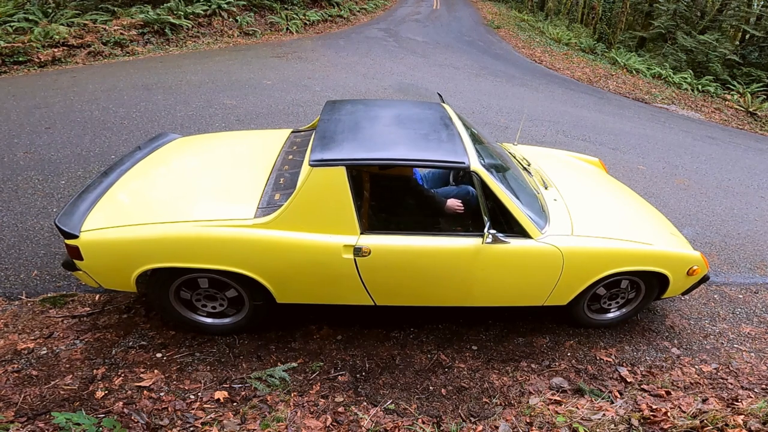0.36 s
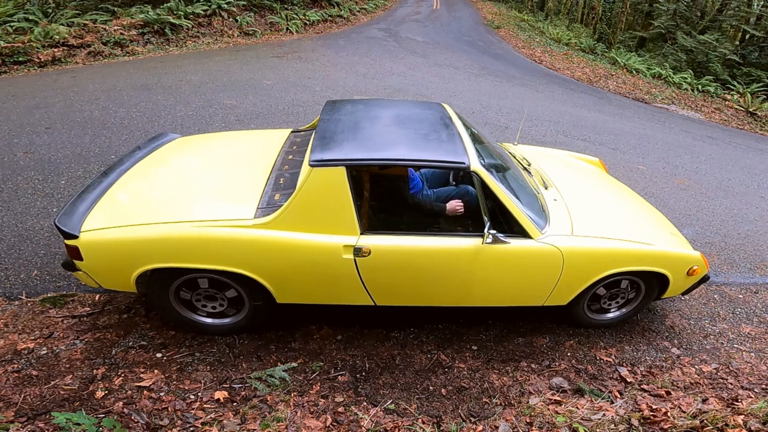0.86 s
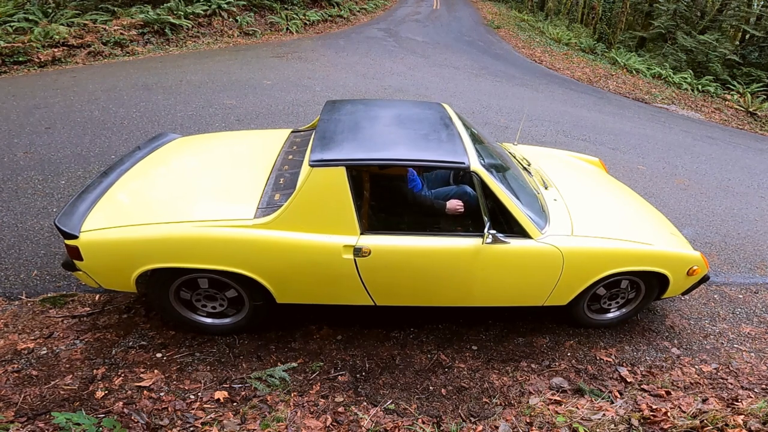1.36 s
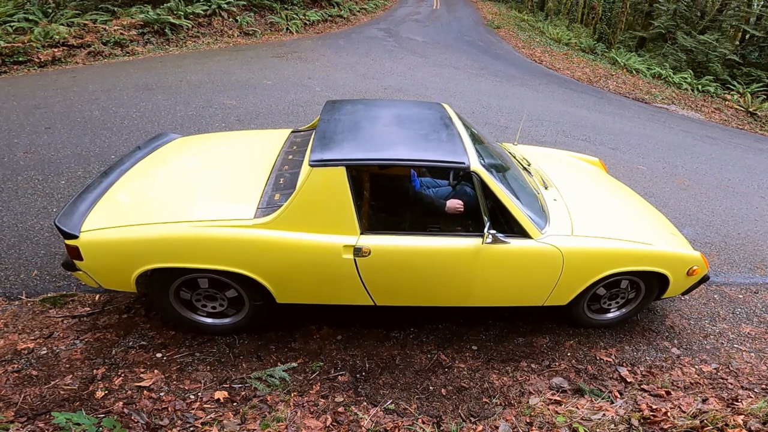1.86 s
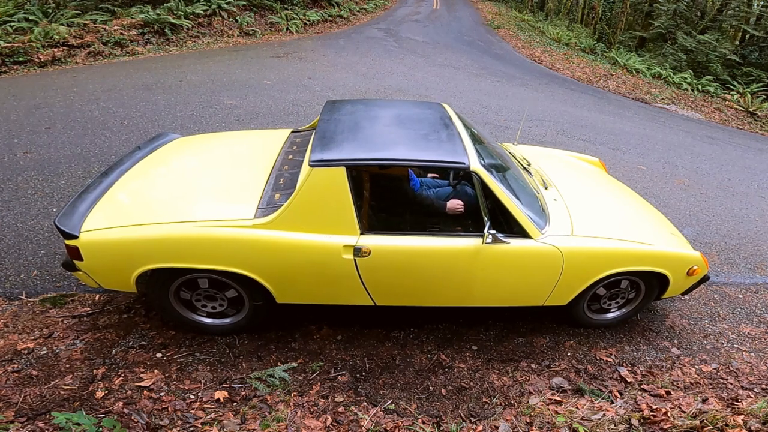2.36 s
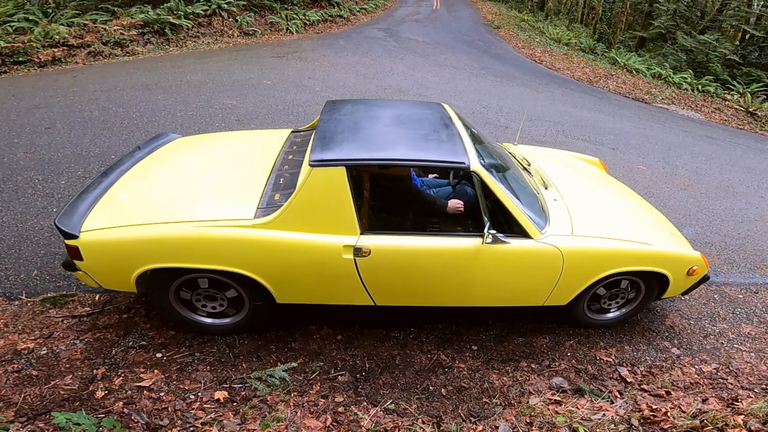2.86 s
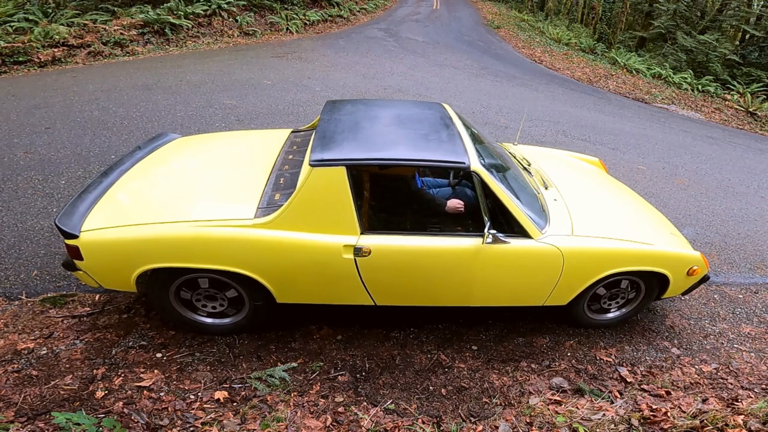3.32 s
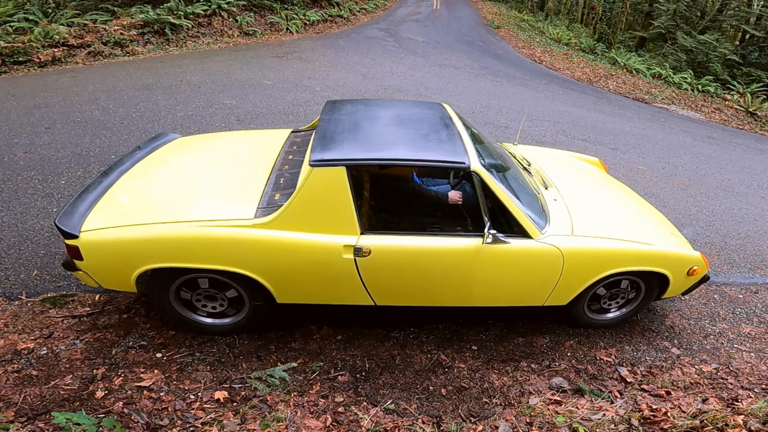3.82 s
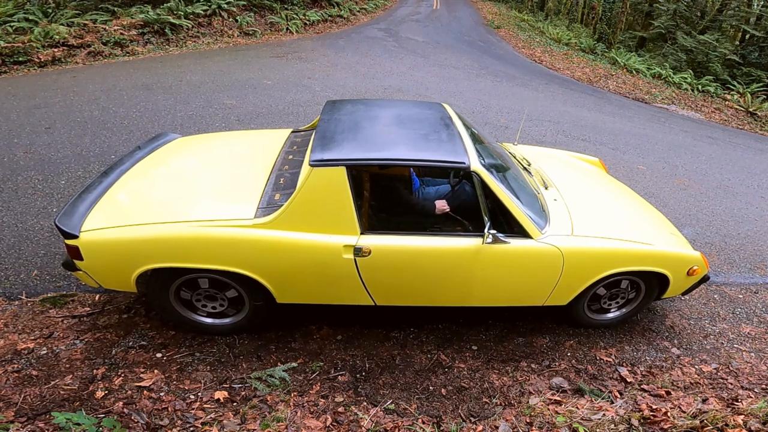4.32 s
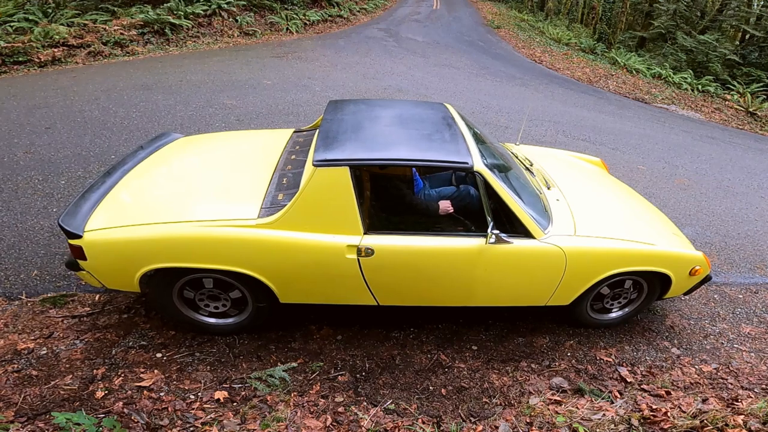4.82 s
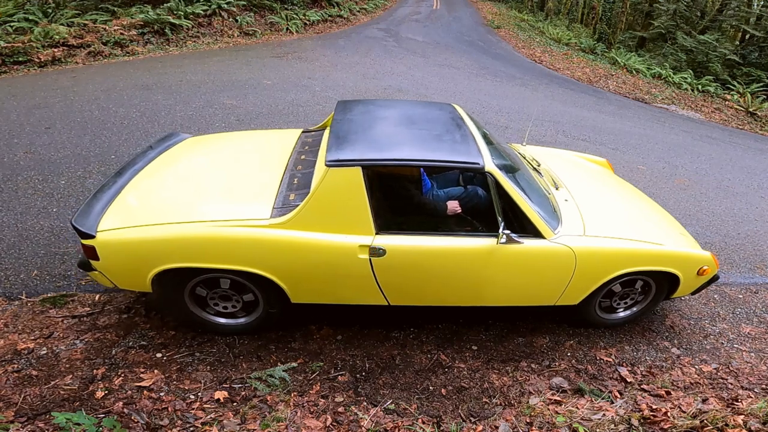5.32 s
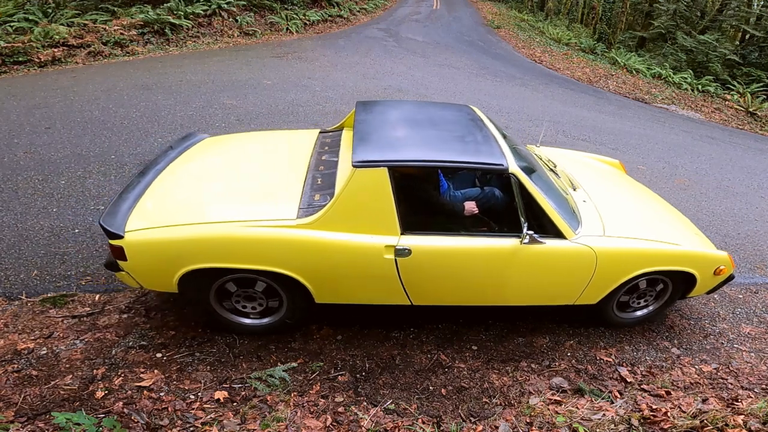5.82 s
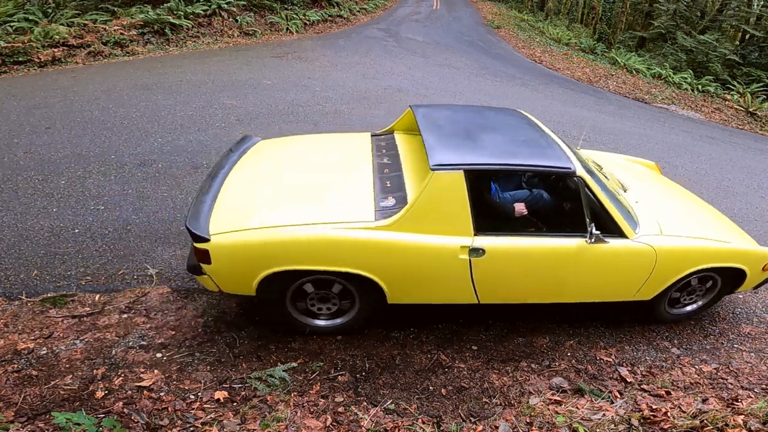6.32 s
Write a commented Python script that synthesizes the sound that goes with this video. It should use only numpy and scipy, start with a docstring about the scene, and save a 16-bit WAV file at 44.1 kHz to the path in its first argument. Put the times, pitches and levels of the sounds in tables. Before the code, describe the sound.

Outdoors, a small air-cooled four-cylinder car idles low and steady under close cloth rustle and padded bumps. About a second in, a door slams very loudly with a quick double contact, slightly overloading the small microphone. Rustling, dull knocks and light hard ticks continue nearby over the idle. In the last second and a half the engine revs sharply into a raspy roar, then eases a little.

```python
"""A small air-cooled four-cylinder car idles at a forest roadside, then revs and pulls away.
Its exhaust is a sum of tones coloured by pipe resonances; valve gear and fan are pulsing noise.
A door slams and dull knocks and ticks sound close by: short scrapes that set a body ringing.
Shaped noise makes the rustle, the engine's bright hiss as it revs and the soft outdoor rumble.
A small microphone overloads on the slam."""
import sys
import numpy as np
from scipy import signal
from scipy.fft import rfft, irfft
from scipy.io import wavfile
from scipy.ndimage import uniform_filter1d

SR = 44100
rng = np.random.default_rng(int(sys.argv[2]) if len(sys.argv) > 2 else 0)


def volts_from_db(level):
    """Convert decibel levels to linear amplitude ratios."""
    exponent = np.asarray(level, float) / 20
    return 10 ** exponent


def transcribe(signal):
    """Save signal, clipped to [-1, 1], as a 16-bit WAV file at the path in sys.argv[1]."""
    frames = np.atleast_2d(signal).T
    limited = np.clip(frames, -1, 1)
    pcm = np.round(limited * 32767).astype(np.int16)
    wavfile.write(sys.argv[1], SR, pcm)


N = 294588  # length in samples


def engine():
    """Firing cycles drive tones through the exhaust; clatter is strongest at each firing, then sags."""
    # engine speed: (time [s], four-stroke cycles per second [Hz])
    speed = [(0, 11.), (1.2, 11.), (1.8, 10.9), (2.6, 10.9), (2.9, 10.75), (4.6, 10.78), (5., 10.87),
             (5.25, 11.2), (5.45, 12.5), (5.6, 15.9), (5.9, 21.9), (6.0, 24.), (6.07, 24.8), (6.16, 25.15),
             (6.25, 25.), (6.34, 24.4), (6.45, 23.1), (6.68, 19.9)]
    # strength over time: (time [s], relative exhaust level [dB], relative clatter level [dB],
    # change of the upper boom [dB])
    strength = [(0, -40.5, -39, 12), (1.0, -43.5, -41.5, 12), (1.4, -39, -41.5, 4.5), (2.7, -42, -40, 5),
                (3.6, -42.5, -42, -0.5), (4.6, -43.5, -38.5, 5.5), (5.3, -43, -40, 6),
                (5.53, -35.5, -34, -3), (5.75, -26.5, -28, -18.5), (5.9, -27, -23.5, -7),
                (6.07, -26, -23.5, 6.5), (6.27, -26, -21.5, -20), (6.68, -26.5, -24.5, -21)]
    # unequal cylinders at full pull: (order = multiple of the cycle rate, relative level [dB])
    cylinders = [(1, -36), (2, -16.5), (3, 0), (4, -1.5), (5, -3), (6, -12.5), (7, -9), (8, 4.5), (9, -6),
                 (10, -33), (11, -14.5), (12, 4), (13, -4.5), (14, -3), (15, -7), (16, -14.5), (17, -11),
                 (18, -14.5), (19, -17.5), (20, -19.5), (21, -1), (22, -12), (23, -20), (24, -14.5)]
    # clatter spectrum: (frequency [Hz], relative level per Hz [dB])
    clatter_colour = [(120, 0), (200, 0.5), (231, -8.5), (268, -2.5), (378, -8), (544, -10.5), (677, -9.5),
                      (1260, -27.5), (1380, -30), (2170, -43), (15500, -86)]
    # mid roar under load: (centre [Hz], width of each filter pass [Hz], level against the clatter [dB])
    roar_hz, roar_width, roar_db = (1820, 640, -30.5)
    idle_hz, pull_hz, opening = 11, 25, 2.76  # load grows from idle to pull speed, along this power
    start_turn, slip_turns = 0.12, 0.001  # starting point and timing unevenness, in cycles
    top_order, high_orders_db = 46, 1.5  # orders missing from the table gain this under load
    waver_db, smear = 1.0, 0.25  # level wander of each order; lag added per order, in cycles
    gate, puff = 0.092, 1.0  # depth of the clatter's sag; its time scale in firing intervals
    firm_db = 11  # loss of low clatter at full load
    hop = 64  # samples between gain updates

    (hz,) = curves(speed)
    pipe_db, clatter_db, boom_db = curves(strength)
    turn = start_turn + np.cumsum(hz) / SR
    uneven = turn + slip_turns * walk(14)
    slow_hz, slow_boom_db = hz[::hop], boom_db[::hop]
    slow_load = np.clip((slow_hz - idle_hz) / (pull_hz - idle_hz), 0, 1) ** opening
    samples, updates = np.arange(N), np.arange(0, N, hop)

    pull = {order: db - exhaust_db(order * pull_hz, 0) for order, db in cylinders}
    pipe = 0
    for order in range(1, top_order + 1):
        # the pipe shapes the idle; under load each order moves to its pulling strength
        db = exhaust_db(order * slow_hz, slow_boom_db) + slow_load * pull.get(order, high_orders_db)
        gain = np.interp(samples, updates, volts_from_db(db)) * volts_from_db(waver_db * walk(8.1))
        # four firings in turn spread the cycle: each higher order peaks a little later
        pipe = pipe + gain * np.cos(2 * np.pi * order * (uneven - smear * order / 2))

    since_firing = 4 * turn % 1  # in firing intervals
    throb = 1 - gate * (1 - np.exp(-since_firing / puff))
    load = np.interp(samples, updates, slow_load)
    flutter = volts_from_db(1.3 * (1 - load) * walk(40))
    clatter = level(coloured(clatter_colour) * throb * flutter, 0)
    dull = signal.sosfilt(signal.butter(2, 1000, fs=SR, output="sos"), clatter)
    # under load combustion steadies, so the low clatter thins while the mids roar
    roar = band(band(rng.standard_normal(N), roar_hz, roar_width), roar_hz, roar_width)
    roar = level(roar * throb, roar_db)
    clatter = clatter - (1 - volts_from_db(-firm_db * load)) * dull + load * roar
    return level(pipe, 5.35) * volts_from_db(pipe_db) + clatter * volts_from_db(clatter_db)


def exhaust_db(hz, boom_db):
    """Level at which the pipe passes a tone: steep resonances, added in power."""
    # pipe resonances: (centre [Hz], half-width [Hz], relative level [dB])
    resonances = [(46, 8, -16), (73.4, 10.8, -1.5), (122.3, 6.9, 6), (183, 13, -15), (258, 3.3, -10),
                  (306.3, 6.7, -2.5), (339, 18, -8), (464, 50, -31), (512, 29, -12), (630, 40, -45),
                  (870, 67, -17.5)]
    # the one whose level changes over time: (centre [Hz], half-width [Hz], level before the change [dB])
    boom_hz, boom_width, boom_base_db = (141, 10.4, 0.4)
    peaks = list(resonances) + [(boom_hz, boom_width, boom_base_db + boom_db)]
    power = sum(volts_from_db(2 * db) / (1 + ((hz - f) / w) ** 2) ** 2 for f, w, db in peaks)
    return 10 * np.log10(power)


def door():
    """The door meets its latch and seal, then its panels shudder out as fading noise."""
    # latch, seal and rebounds; peak levels before the body and filters act:
    # (time [s], crack [dB], rap [dB], thud [dB], thud pitch [Hz], contact time [ms])
    slam = [(1.0999, -3.5, -4.5, -0.5, 141, 6.3), (1.1287, -7, -5.5, -6.5, 167, 15.2),
            (1.155, -25, -20, -12.5, 154, 9.4), (1.1636, -19, -13, -12, 194, 15),
            (1.2048, -46, -26, -18, 170, 15), (1.232, -49, -45, -20, 161, 11)]
    # ringing of the door: (frequency [Hz], relative level [dB], time to fade by about 71 dB [s])
    door_modes = [(61.6, -5.5, 0.218), (93.7, 4, 0.049), (133.7, 1, 0.048), (189.4, 1.5, 0.06),
                  (228, -4.5, 0.061), (352, 5.5, 0.078), (570, -6.5, 0.028), (944, 0, 0.016)]
    # panels after the slam: (centre [Hz], width of each filter pass [Hz],
    # level before the fade [dB], fade time to 1/e [s])
    hz, width, db, decay = (402, 650, -24, 0.0651)
    crack_hz = 2310
    hits = [(s, crack, crack_hz, *rest) for s, crack, *rest in slam]
    since = np.maximum(np.arange(N) / SR - slam[1][0], 0)  # seconds after the second contact
    shudder = level(band(band(rng.standard_normal(N), hz, width), hz, width), db)
    shudder = shudder * (since > 0) * np.exp(-since / decay)
    hit = blows(hits, door_modes, top_hz=9000, tail_db=-35, ring_db=7.5, rise_ms=1.5, direct_db=0.5)
    return hit + shudder


def knocks():
    """Padded knocks and hard light ticks near the microphone, all ringing one body."""
    # padded knocks; peak levels before the body and filters act:
    # (time [s], crack [dB], rap [dB], thud [dB], thud pitch [Hz])
    thump_hits = [(.4183, -47, -49, -30.5, 161), (.7033, -46, -31, -31, 166),
                  (0.7939, -39, -34.5, -25, 246), (1.003, -39, -33.5, -30, 262),
                  (1.045, -34, -32, -22.5, 217), (1.3859, -54, -39, -47, 322),
                  (1.5958, -38, -28.5, -20, 275), (1.6662, -37, -31.5, -30.5, 163),
                  (1.707, -43, -30.5, -32, 158), (1.7455, -55, -37, -31, 157),
                  (2.1737, -36, -41.5, -28, 279), (2.228, -32.5, -33, -33.5, 366),
                  (2.44, -18, -15, -16.5, 208), (2.485, -56, -31, -26, 161), (2.6177, -45, -44, -37, 555),
                  (3.003, -43, -33.5, -32, 154), (3.2268, -50, -41, -34.5, 298),
                  (3.2746, -40, -44, -26, 347), (3.2922, -45, -28.5, -22, 211),
                  (3.3303, -57, -39, -28, 188), (3.7395, -49, -39, -34, 301), (3.7623, -58, -34, -30, 162),
                  (3.8218, -50, -36.5, -33.5, 297), (3.8524, -36, -39, -30.5, 169),
                  (3.8655, -24, -16.5, -22, 497), (3.896, -31, -25, -23, 215),
                  (3.9076, -48, -28, -18.5, 487), (3.916, -52, -40, -24.5, 119),
                  (4.2839, -30, -27, -25, 183), (4.3081, -53, -36, -18.5, 183),
                  (6.5831, -36.5, -30, -40, 316)]
    # hard light ticks, levels likewise: (time [s], crack [dB], crack pitch [Hz], rap [dB])
    tick_hits = [(1.8919, -43, 1500, -33), (1.9244, -39, 2900, -32.5), (2.393, -38, 1720, -60),
                 (2.5728, -43, 3900, -51), (2.6607, -35, 2250, -43), (2.703, -24, 3670, -34.5),
                 (2.8653, -37, 1720, -40), (3.4342, -42.5, 3020, -41), (3.497, -47, 1600, -31),
                 (3.5295, -43, 3850, -52), (3.6187, -41.5, 4000, -61), (4.179, -50, 2280, -46),
                 (4.483, -53, 2000, -51), (4.6915, -34.5, 1410, -32), (4.8326, -53, 1640, -30.5),
                 (5.6288, -44, 1610, -51)]
    # what they ring with: (frequency [Hz], relative level [dB], time to fade by about 71 dB [s])
    body_modes = [(76, 1, 0.054), (101, 3.5, 0.12), (128, 6, 0.09), (168.2, 5, 0.1), (219, -3.5, 0.063),
                  (275, 3, 0.075), (357, 2, 0.029), (489, -6.5, 0.13), (542, 2, 0.025), (762, 5.5, 0.028),
                  (932, -3.5, 0.026), (1200, -1, 0.061)]
    thump_crack_hz, brighter_hz_per_db = 1700, 34.5  # pitch of a -40 dB crack; harder cracks are higher
    thump_ms, tick_ms = 16.3, 8.6  # contact times
    tick_thud_hz, tick_thud_db = 170, -61
    thumps = []
    for s, crack, rap, thud, hz in thump_hits:
        crack_hz = thump_crack_hz + brighter_hz_per_db * (crack + 40)
        thumps.append((s, crack, crack_hz, rap, thud, hz, thump_ms))
    ticks = [(s, crack, hz, rap, tick_thud_db, tick_thud_hz, tick_ms) for s, crack, hz, rap in tick_hits]
    return blows(thumps + ticks, body_modes, top_hz=6900, tail_db=-21, ring_db=6, rise_ms=4.5,
                 crack_share=0.75)


def blows(table, modes, top_hz, tail_db, ring_db, rise_ms, crack_share=0.94, direct_db=-2.5):
    """Each contact is a short scrape: its treble cracks, its rap and thud drive the ringing body."""
    edge, tail_ms = 1.52, 35  # steepness of the contact's end; fade time of the faint tail
    rap_hz, rough_db = 700, 6  # rap pitch; peak of the thud's roughness against its pure swing
    crack, push = np.zeros(N + SR), np.zeros(N + SR)
    ms = np.arange(SR // 5) * 1000 / SR
    noise = rng.standard_normal((len(table), 3, len(ms)))
    rise = 1 - np.exp(-ms / rise_ms)
    tail = volts_from_db(tail_db) * np.exp(-ms / tail_ms)
    for hit, (fine, mid, coarse) in zip(table, noise):
        s, crack_db, crack_hz, rap_db, thud_db, thud_hz, contact_ms = hit
        start = int((s - rise_ms / 2000) * SR)  # half a rise time early
        i = slice(start, start + len(ms))
        shape = rise * np.exp(-(ms / max(contact_ms, 1)) ** edge)
        ragged = shape + rise * tail
        # the treble dies before the padded part of the contact ends
        brief = rise * (np.exp(-(ms / max(crack_share * contact_ms, 1)) ** edge) + tail)
        snap = band(fine, crack_hz, 0.75 * crack_hz) * brief
        # a small hard part rings for a moment at the crack's pitch
        crack[i] += peak(snap + volts_from_db(-10.0) * band(snap, crack_hz, 110), crack_db)
        rap = band(band(mid, rap_hz, 970), rap_hz, 1400)
        push[i] += peak(rap * ragged, rap_db)
        # the padded part of the blow swings at one pitch, roughened by noise
        swing = np.sin(2 * np.pi * thud_hz * ms / 1000 + coarse[0])  # random starting phase
        rough = band(band(coarse, thud_hz, 0.82 * thud_hz), thud_hz, 0.76 * thud_hz)
        push[i] += peak((swing + peak(rough, rough_db)) * shape, thud_db)
    ring = 0
    for k, (hz, db, fade) in enumerate(modes):
        ring = ring + (-1) ** k * volts_from_db(db) * band(push, hz, 2.6 / fade)
    crack = signal.sosfilt(signal.butter(2, [1100, top_hz], "band", fs=SR, output="sos"), crack)
    return (volts_from_db(ring_db) * ring + volts_from_db(direct_db) * push + crack)[:N]


def rustle():
    """Bright patchy noise like rubbed cloth, then the engine's bright hiss, with a dull rub under it."""
    # steady part, rubbing at first, then the engine's bright hiss as it revs:
    # (time [s], bright level [dB], dull level [dB])
    steady = [(0, -55, -36), (.1, -51, -36), (.8, -47.5, -38), (1.0, -57.5, -36.5), (1.2, -59.5, -39),
              (2.5, -62.5, -43), (4.5, -66.5, -47), (5.25, -70.5, -48.5), (5.65, -61, -53), (6.1, -52, -55),
              (6.68, -54.5, -62)]
    # single rubbing strokes on top: (middle [s], length [s], bright peak [dB], dull peak [dB])
    strokes = [(.69, 0.15, -59, -36), (0.79, .14, -65, -31), (1.41, 0.19, -59.5, -40.5),
               (1.66, 0.38, -55, -38.5), (1.903, 0.21, -52.5, -47), (2.21, 0.21, -53, -38),
               (2.42, 0.33, -55, -39), (2.68, .2, -60.5, -41.5), (3.027, 0.34, -58.5, -40.5),
               (3.246, 0.3, -54.5, -45), (3.76, 0.32, -59.5, -63), (3.904, 0.15, -54, -35),
               (4.093, 0.3, -53.5, -50), (4.294, 0.13, -49, -38), (4.603, 0.14, -60, -50),
               (4.79, 0.68, -61, -47)]
    # bright spectrum: (frequency [Hz], relative level per Hz [dB])
    bright_colour = [(710, -3.5), (1200, -1.5), (1880, -19.5), (2210, -8), (3500, -9), (4340, -7),
                     (6870, -13), (10800, -34), (15500, -60)]
    t = np.arange(N) / SR
    patchy = np.interp(t, [5.1, 5.5], [1, 0.35])  # engine hiss is smoother than cloth
    power = volts_from_db(2 * np.array(curves(steady)))
    for middle, length, *db in strokes:
        i = slice(int((middle - length / 2) * SR), int((middle + length / 2) * SR))
        swell = np.cos(np.pi * (t[i] - middle) / length) ** 2
        power[:, i] += np.outer(volts_from_db(2 * np.array(db)), swell)
    bright = coloured(bright_colour) * volts_from_db(patchy * (1.2 * walk(90) + 1.8 * walk(25)))
    dull = band(rng.standard_normal(N), 250, 402) * volts_from_db(2.0 * walk(50))
    dull = band(dull, 460, 435)
    return level(bright, 0) * np.sqrt(power[0]) + level(dull, 0) * np.sqrt(power[1])


def rumble():
    """A soft unsteady rumble of outdoor air: low noise whose level wanders."""
    low = band(band(rng.standard_normal(N), 71.4, 50), 55, 70)
    return level(low * volts_from_db(3.3 * walk(5.6)), -41)


def level(x, db):
    """Set the rms level, the average strength."""
    return x * volts_from_db(db) / np.sqrt(np.mean(x ** 2))


def peak(x, db):
    """Set the peak level."""
    return x * volts_from_db(db) / np.abs(x).max()


def band(x, hz, width):
    """Two-pole resonance with gain 1 at its centre."""
    return signal.lfilter(*signal.iirpeak(min(hz, 0.4 * SR), hz / width, fs=SR), x)


def coloured(points):
    """Noise of rms 1 with the spectrum drawn through (frequency [Hz], level [dB]) points."""
    hz, db = np.transpose(points)
    f = np.fft.rfftfreq(N, 1 / SR)
    gain = volts_from_db(np.interp(np.log(f + 1), np.log(hz), db, left=-120))
    return level(irfft(rfft(rng.standard_normal(N)) * gain, N), 0)


def walk(rate):
    """Random levels held 1 / rate seconds and smoothed twice; spread near 1."""
    k = int(SR / rate)
    held = np.repeat(rng.standard_normal(N // k + 1), k)
    return 1.45 * uniform_filter1d(uniform_filter1d(held, k), k)[:N]


def curves(table):
    """Columns of a time table, one value a sample."""
    s, *columns = np.transpose(table)
    return [np.interp(np.arange(N) / SR, s, c) for c in columns]


def scene():
    """Engine, rumble, rustle, door and knocks add up at one microphone."""
    return (engine() + rumble() + rustle() + door() + knocks())[None]


def roll_off(x):
    """The treble ends steeply here."""
    return signal.sosfilt(signal.butter(12, 15870, fs=SR, output="sos"), x)


def record(dry):
    """The microphone hisses faintly, drops the deepest bass and flattens the loudest peaks."""
    hiss_db = -69.5  # before its treble is softened
    hiss = signal.sosfilt(signal.butter(1, 9000, fs=SR, output="sos"), rng.standard_normal(dry.shape))
    x = dry + volts_from_db(hiss_db) * hiss
    x = signal.sosfilt(signal.butter(2, 38, "high", fs=SR, output="sos"), x)
    mix = x / (1 + np.abs(x / 0.95) ** 4) ** 0.25  # peaks bend towards 0.95
    return roll_off(mix)


dry = scene()
out = record(dry)
transcribe(out)
```